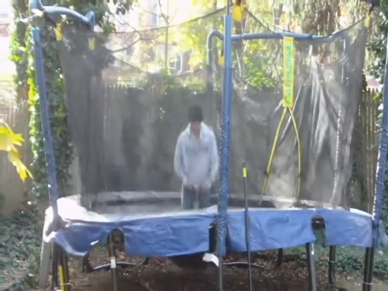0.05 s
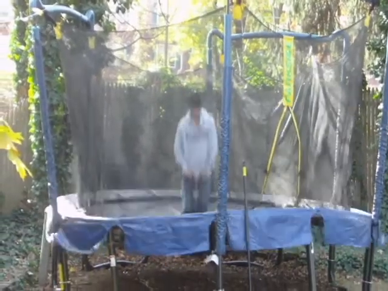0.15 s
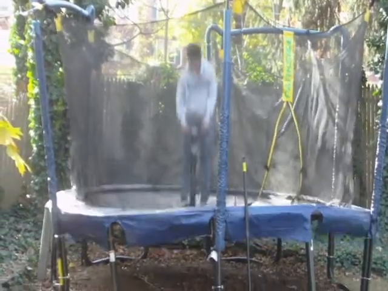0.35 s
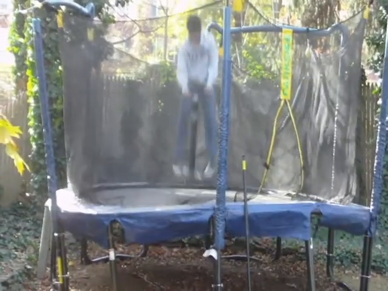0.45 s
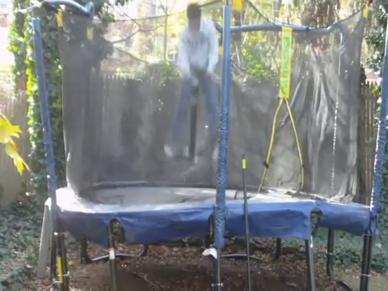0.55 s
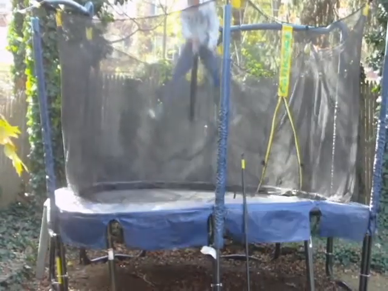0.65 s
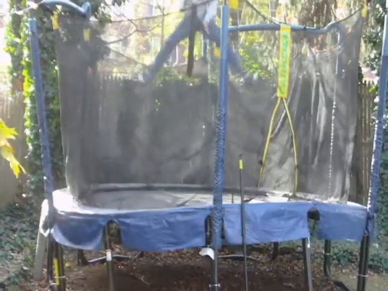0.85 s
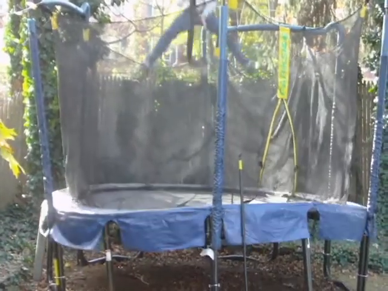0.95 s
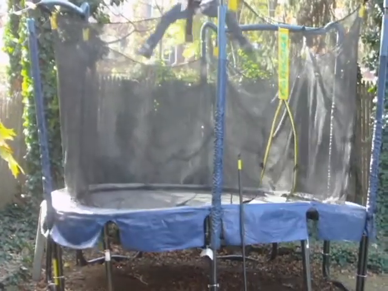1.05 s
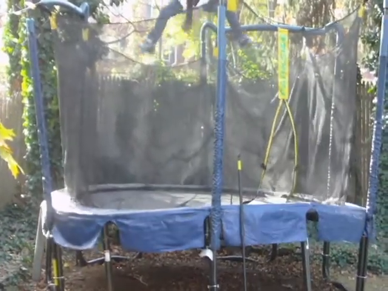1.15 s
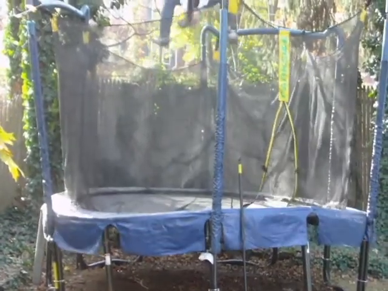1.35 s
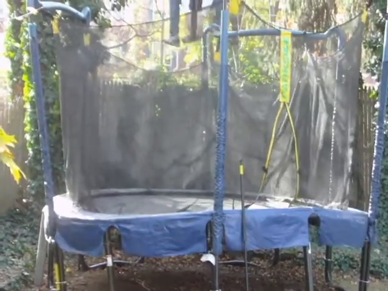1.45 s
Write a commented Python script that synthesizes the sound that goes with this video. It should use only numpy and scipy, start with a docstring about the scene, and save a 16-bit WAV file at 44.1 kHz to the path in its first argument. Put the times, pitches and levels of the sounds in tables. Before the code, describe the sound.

One bounce on a backyard trampoline, heard from a few metres off: a deep thump and frame rattle, then squeaking, rasping springs and a softer flap of the mat. Light wind and a distant hum lie behind.

```python
"""A low thump and a gust of air: one bounce on a backyard trampoline, a few metres away.
The mat throws the jumper up, then flaps. Springs, pad and net rasp as they stretch and slacken;
single springs squeak, and the frame knocks and rattles under the load.
Behind it are light wind, a distant hum and a faint microphone hiss and whine."""
import sys
import numpy as np
from scipy import signal
from scipy.fft import rfft, irfft
from scipy.io import wavfile

SR = 44100
rng = np.random.default_rng(int(sys.argv[2]) if len(sys.argv) > 2 else 0)


def master_out(mix):
    """Clip the mix to full scale and print it as 16-bit PCM to the path in sys.argv[1]."""
    frames = np.transpose(np.atleast_2d(mix))
    ceiling = np.clip(frames, -1, 1)
    pcm = np.round(ceiling * 32767).astype(np.int16)
    wavfile.write(sys.argv[1], SR, pcm)


N = 66150
TIME = np.arange(N) / SR
SIDE = np.array([[1], [-1]])  # left plus, right minus

# Rubbing spectrum of springs, pad and net. Each row: frequency in Hz, density in dB.
RUB_SPECTRUM = [(150, -5.5), (400, -1.5), (800, -0.5), (1250, -0.5), (1650, -3.5), (1950, -2), (2120, -7),
                (2900, -10), (3500, -13.5), (5000, -19), (6800, -25), (7500, -30)]


def from_db(db):
    return 10 ** (np.asarray(db) / 20)


def unit_rms(x):
    return x / np.sqrt(np.mean(x ** 2) + 1e-20)


def coloured(x, spectrum):
    """Filter by (Hz, dB) points; rms 1."""
    hz, db = np.transpose(spectrum)
    bins_hz = np.maximum(np.arange(N // 2 + 1) * SR / N, 1)
    gain = from_db(np.interp(np.log(bins_hz), np.log(hz), db))
    return unit_rms(irfft(rfft(x) * gain, N))


def noise(spectrum):
    return coloured(rng.standard_normal(N), spectrum)


def drift(rate_hz):
    """Random wander; rms 1."""
    bins_hz = np.arange(N // 2 + 1) * SR / N
    return unit_rms(irfft(rfft(rng.standard_normal(N)) / (1 + (bins_hz / rate_hz) ** 2), N))


def envelope(start_s, attack_s, hold_s, t60_s):
    """Linear rise, hold, exponential release."""
    age_s = TIME - start_s
    release_s = np.maximum(age_s - attack_s - hold_s, 0)
    return np.clip(age_s / attack_s, 0, 1) * from_db(-60 * release_s / t60_s)


def swells(strokes):
    return sum(from_db(db) * envelope(*timing) for *timing, db in strokes)


def ring(x, hz, t60_s):
    """One mode: a unit click starts a decaying sine of height 1."""
    radius = np.exp(-np.log(1000) / (t60_s * SR))
    angle = 2 * np.pi * hz / SR
    return signal.lfilter([0, np.sin(angle)], [1, -2 * radius * np.cos(angle), radius ** 2], x + 1e-18)


def slips(rate_per_s=5000, spread_db=1):
    """Stick-slip: dense tiny clicks of uneven size; rms 1."""
    sizes = from_db(spread_db * np.minimum(rng.exponential(1, N), 4)) * rng.choice([-1, 1], N)
    return unit_rms(sizes * (rng.random(N) < rate_per_s / SR))


def stutter(depth, rate_hz=32, peak_s=0.482):
    """Gain ripple of springs that catch and slip regularly."""
    return 1 + depth * np.cos(2 * np.pi * rate_hz * (TIME - peak_s))


def background(hum_db=-41, hiss_db=-62, whine_db=-72, whine_hz=3935):
    """Distant outdoor hum, with the microphone's hiss and thin whine."""
    # Each row of both: frequency in Hz, density in dB.
    hum_spectrum = [(60, 6), (160, 1), (230, 4), (480, 3), (750, -1.5), (1050, -10.5), (1400, -19.5),
                    (2500, -45), (7500, -73)]
    hiss_spectrum = [(100, 7), (1000, -6), (4000, -1.5), (7500, -4)]
    hum = from_db(hum_db) * noise(hum_spectrum)
    hiss = from_db(hiss_db) * np.array([noise(hiss_spectrum), noise(hiss_spectrum)])
    whine = from_db(whine_db) * np.sqrt(2) * np.sin(2 * np.pi * whine_hz * TIME)
    return hum + hiss + whine


def wind(mid_db=-33.5, side_db=-51, fade_db_per_s=2, lump_db=2.5):
    """A lumpy, easing breeze on the microphone, partly different at each port."""
    # Each row of both: frequency in Hz, density in dB.
    mid_spectrum = [(12, -18.5), (24, 1.5), (42, -1.5), (80, -16.5), (150, -20), (300, -31.5), (1000, -78)]
    side_spectrum = [(12, -16.5), (24, 10.5), (45, -4.5), (90, -28), (250, -26.5), (1000, -48)]
    buffeting = unit_rms(noise(mid_spectrum) * from_db(lump_db * drift(4.9)))
    mid = from_db(mid_db - fade_db_per_s * TIME) * buffeting
    return mid + from_db(side_db) * noise(side_spectrum) * SIDE


def net(level_db=-44.5, fade_db_per_s=13, flutter_db=2):
    """The net rustles, fading as the frame settles."""
    rustle = coloured(slips(), RUB_SPECTRUM)
    return rustle * from_db(level_db - fade_db_per_s * TIME + flutter_db * drift(5))


def frame_rattles(low_hz=690):
    """Loose joints chatter in short bursts."""
    # Each row: start in seconds, level in dB, upper band edge in Hz.
    bursts = [(0.214, -36.5, 1300), (0.254, -29, 1254), (0.345, -30.5, 1300), (0.409, -48, 3900),
              (0.475, -34, 2860), (0.713, -48, 2800), (0.753, -48.5, 2800), (0.794, -44.5, 2200),
              (0.968, -46, 1590)]
    out = 0
    for start_s, db, top_hz in bursts:
        band = signal.butter(2, [low_hz, top_hz], "band", fs=SR, output="sos")
        chatter = unit_rms(signal.sosfilt(band, slips()))
        out += from_db(db) * chatter * envelope(start_s, attack_s=0.0032, hold_s=0.0017, t60_s=0.07)
    return out


def frame_knocks():
    """The frame knocks under load and its hollow tubes ring."""
    # Each row: time in seconds, level in dB.
    knocks = [(0.231, -32), (0.2585, -17.5), (0.345, -44)]
    # Each row: frequency in Hz, gain in dB, t60 in seconds.
    tube_modes = [(349, -0.5, 0.17), (475.4, -14.5, 0.29), (545, -6, .15), (609, -11, .08),
                  (811.5, -8.5, 0.23), (1153, -15, 0.16), (1122, -10, .1)]
    blows = sum(from_db(db) * (np.arange(N) == int(at_s * SR)) for at_s, db in knocks)
    return sum(from_db(db) * ring(blows, hz, t60_s) for hz, db, t60_s in tube_modes)


def spring_squeaks(wander_hz=14, rough_db=2.5):
    """Single slipping springs sing on a rough, unsteady pitch."""
    # Each row: start, attack, hold and t60 in seconds, pitch in Hz, level in dB.
    squeaks = [(0.044, 0.026, 0.015, 0.073, 1882, -41.5), (0.469, .004, 0.1, 0.42, 1830, -39),
               (0.483, 0.0092, 0.078, 0.6, 1482, -38)]
    out = 0
    for *timing, hz, db in squeaks:
        phase = 2 * np.pi * np.cumsum(hz + wander_hz * drift(70)) / SR
        tone = unit_rms(np.sin(phase) * from_db(rough_db * drift(62)))
        out += from_db(db) * envelope(*timing) * tone
    return out * stutter(depth=0.3)


def spring_rasps(side_db=-21):
    """Springs and pad rub in stick-slip grains and the coils ring; the treble is wide."""
    # Each row: start, attack, hold and t60 in seconds, level in dB.
    strokes = [(-0.02, 0.011, 0.099, 0.25, -36.5), (0.474, 0.0026, 0.15, 0.45, -33.5),
               (0.70, 0.027, 0.069, 0.55, -50), (1.165, 0.013, 0.088, 0.42, -58)]
    # Each row: frequency in Hz, bandwidth in Hz, level in dB.
    coil_modes = [(812, 90, -17.5), (1140, 160, -10.5), (2275, 51, -17), (2800, 39, -19), (3167, 37, -18),
                  (3670, 25, -22.5), (4290, 68, -24), (4654, 70, -22.5), (5030, 50, -24.5), (5670, 50, -27)]
    # Each row: frequency in Hz, density in dB.
    side_spectrum = [(300, -34), (1500, -24.5), (2500, 0), (4000, 7), (6000, 4), (7500, -3.5)]
    coils = 0
    for hz, width_hz, db in coil_modes:
        t60_s = np.log(1000) / (np.pi * width_hz)
        coils += from_db(db) * unit_rms(ring(slips(), hz, t60_s))
    side = from_db(side_db) * coloured(slips(), side_spectrum) * SIDE
    grains = coloured(slips(), RUB_SPECTRUM)
    return swells(strokes) * stutter(depth=0.05) * (grains + coils + side)


def mat_billows():
    """Deep puffs of air from the swaying mat, felt more than heard."""
    # Each row: start, attack, hold and t60 in seconds, level in dB.
    puffs = [(0.200, 0.011, 0.029, 0.14, -20.5), (0.46, 0.011, 0.1, 0.18, -42), (0.91, .03, .17, 0.14, -39)]
    # Each row: frequency in Hz, density in dB.
    puff_spectrum = [(15, -19), (36, -4.5), (65, 11), (110, -3), (170, -23), (400, -71)]
    return noise(puff_spectrum) * swells(puffs)


def mat_gusts():
    """Dull rush of air and cloth pushed by the swinging mat."""
    # Each row: start, attack, hold and t60 in seconds, level in dB.
    gusts = [(0.195, 0.041, 0.013, 0.2, -20), (0.269, .02, 0.12, 0.85, -32.5),
             (0.896, 0.019, 0.053, 0.28, -39.5)]
    # Each row: frequency in Hz, density in dB.
    gust_spectrum = [(30, -0.5), (110, 5), (165, -1.5), (230, -9), (345, 2.5), (430, -8.5), (820, -5.5),
                     (1200, -16), (2000, -23.5), (4000, -36), (7500, -70)]
    return noise(gust_spectrum) * swells(gusts)


def mat_thumps():
    """Short soft jolts drive the mat's modes; the air follows the mat's velocity."""
    # Each row: centre in seconds, level in dB, contact time in seconds.
    jolts = [(0.213, -14.5, 0.0056), (0.2327, -7, 0.0036), (0.25, -8.5, .003), (0.267, -12.5, 0.0024),
             (0.324, -22, 0.0024), (0.361, -24.5, 0.0023), (0.411, -25.5, 0.0019), (0.476, -26, 0.0035),
             (0.625, -39, 0.0013), (0.934, -27, 0.0047), (0.961, -32, 0.0028), (0.979, -26, 0.0035),
             (1.073, -35, 0.0054)]
    # Each row: frequency in Hz, gain in dB, t60 in seconds.
    mat_modes = [(54.1, -4.5, 0.17), (79.9, -0.5, 0.13), (95.6, -0.5, 0.1), (118, -1, 0.11)]
    force = 0
    for centre_s, db, contact_s in jolts:
        pulse = np.exp(-2 * ((TIME - centre_s) / contact_s) ** 2)
        force += from_db(db) * pulse / pulse.sum()
    out = 0
    for hz, db, t60_s in mat_modes:
        velocity = np.gradient(ring(force, hz, t60_s)) * SR
        out += from_db(db) * velocity / (2 * np.pi * hz)
    return out


def scene(bass_pan_db=0.73, body_pan_db=0.2, background_pan_db=-0.6):
    """Nearly mono; the bass leans slightly left."""
    bass = (mat_thumps() + mat_billows() + wind()) * from_db(bass_pan_db * SIDE)
    body = (mat_gusts() + frame_knocks()) * from_db(body_pan_db * SIDE)
    friction = spring_rasps() + spring_squeaks() + frame_rattles() + net()
    return bass + body + friction + background() * from_db(background_pan_db * SIDE)


def record(dry, cutoff_hz=7400):
    """Steep low-pass."""
    return signal.sosfilt(signal.ellip(10, 0.3, 80, cutoff_hz, fs=SR, output="sos"), dry)


dry = scene()
out = record(dry)
master_out(out)
```